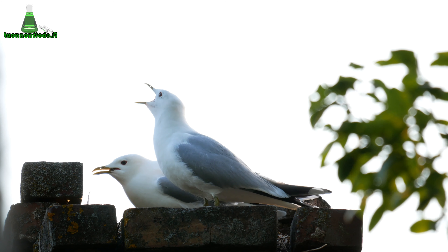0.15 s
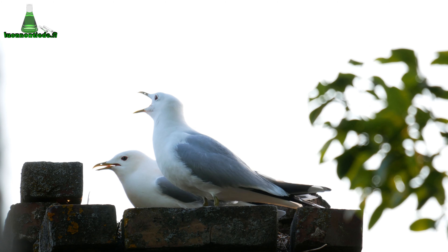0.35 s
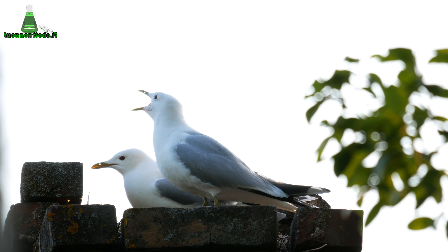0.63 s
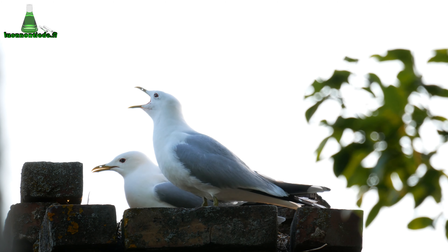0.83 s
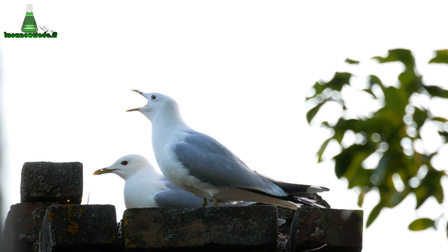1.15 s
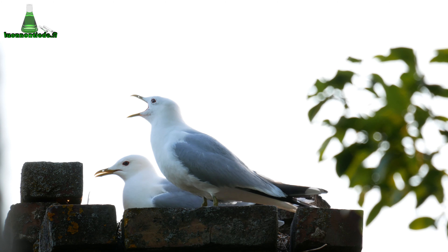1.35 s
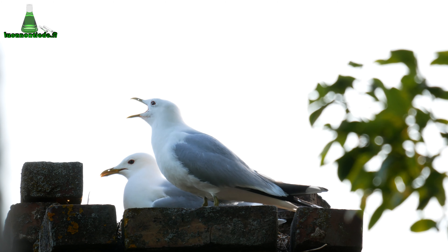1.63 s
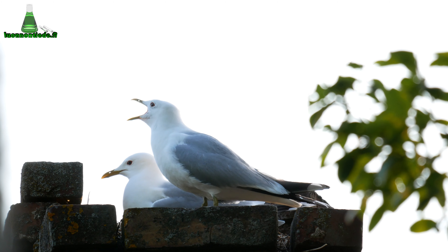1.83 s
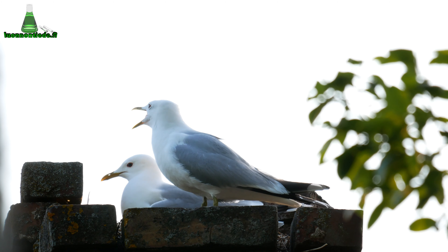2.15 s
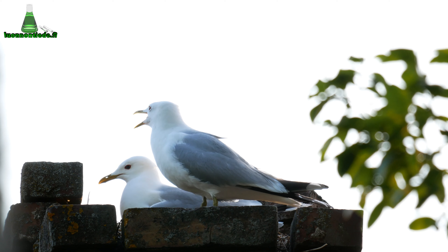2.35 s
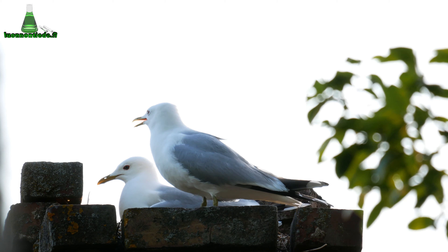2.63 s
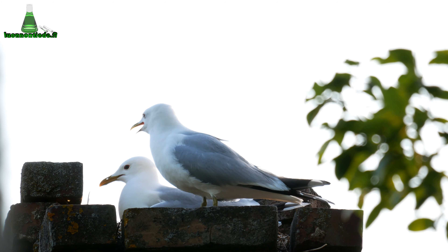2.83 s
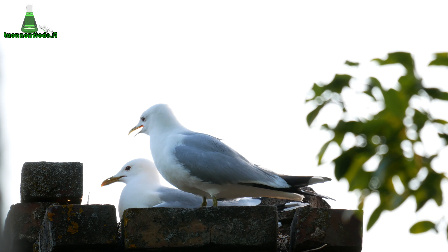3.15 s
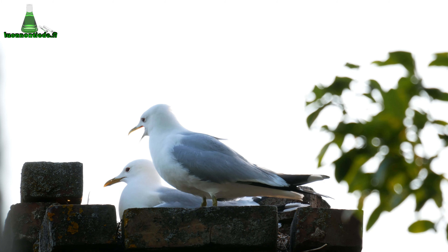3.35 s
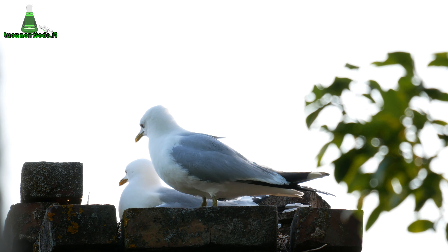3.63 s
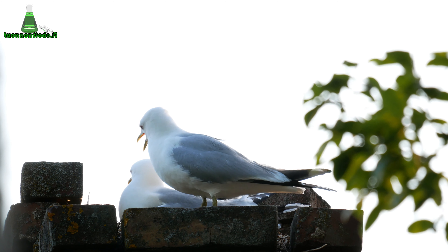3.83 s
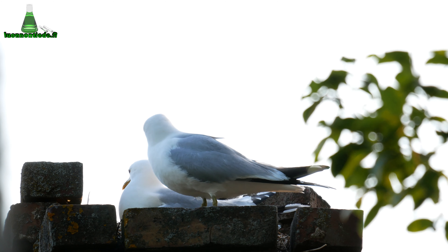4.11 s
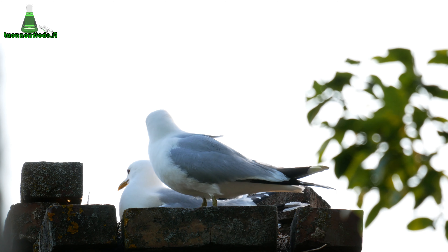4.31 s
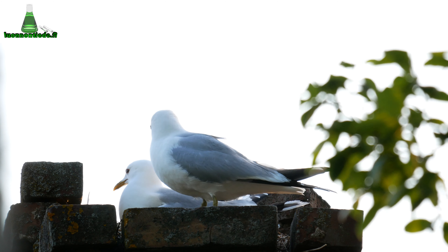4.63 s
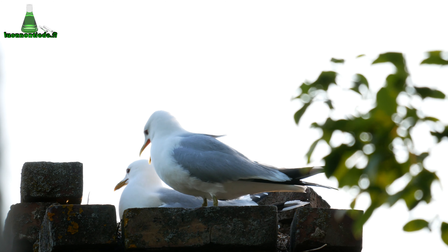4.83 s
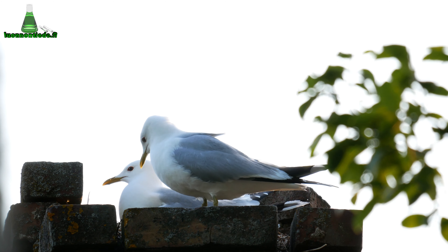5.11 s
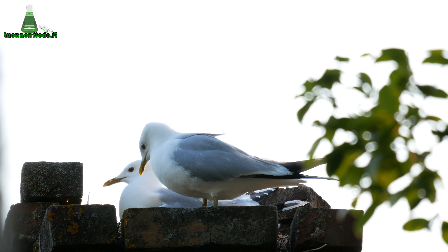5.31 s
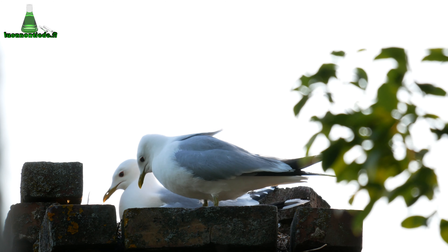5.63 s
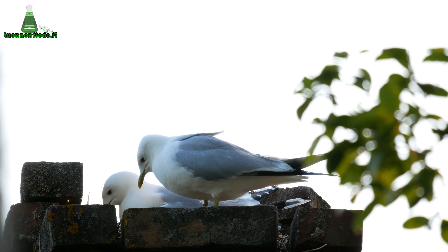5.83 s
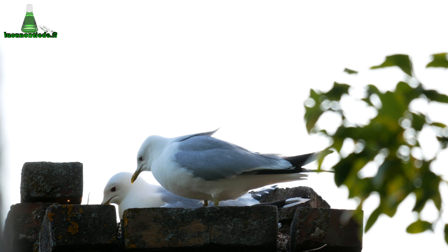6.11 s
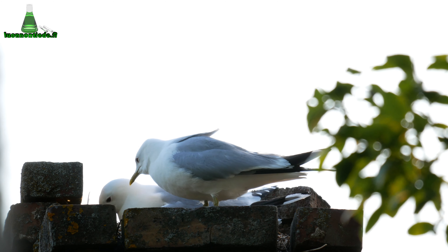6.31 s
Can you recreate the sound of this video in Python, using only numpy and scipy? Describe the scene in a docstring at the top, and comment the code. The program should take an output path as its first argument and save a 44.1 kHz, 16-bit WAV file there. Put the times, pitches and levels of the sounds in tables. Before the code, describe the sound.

A gull calls loudly in the open, already mid-cry at the start. Piercing cries follow about three a second, each a short rasp breaking into a squeal; the early ones flip through a thin whistle, later ones are shorter single yelps. After a small gap comes one last cry, then only faint distant traffic. The bird is clear and almost central, with slapping echoes from walls and gardens spread around it.

```python
"""Gull's long call from a chimney

A gull gives fifteen cries, the first already under way and the last one alone; its bill sinks midway.
Each cry starts as a low rasp and breaks up into a squeal; the early ones flip into a thin whistle on the way.
The voice is summed harmonics and pulsed hiss, shaped by throat and bill.
Walls and gardens answer as echoes and scattered noise, over distant traffic made of coloured noise."""
import sys
import numpy as np
from scipy import signal
from scipy.fft import rfft, irfft, next_fast_len
from scipy.io import wavfile
from scipy.ndimage import uniform_filter1d, map_coordinates

SR = 44100
rng = np.random.default_rng(int(sys.argv[2]) if len(sys.argv) > 2 else 0)


def wrap_up_sound(samples):
    """Save the sound to the file named by the first command line argument, as 16-bit audio."""
    columns = np.atleast_2d(samples).T
    # keep every value between -1 and 1, then stretch to whole-number steps
    tamed = np.clip(columns, -1, 1)
    steps = np.round(tamed * 32767).astype(np.int16)
    wavfile.write(sys.argv[1], SR, steps)


N = 285327
LEAD = SR // 4  # samples of calling before time zero
TIME = np.arange(-LEAD, N) / SR  # the gull is already calling at time zero
TOP_HZ = 15150  # band limit

# All dB columns are relative: mix trims are added where the layers are built.

# Early cries: rasp, squeal, whistle, squeal. Each row: voice break in seconds, then lengths in seconds
# of rasp, first squeal, whistle, hold before the slip and slide after it, then top pitch, scoop and slip
# in Hz, then level, second harmonic and upper harmonics in dB.
EARLY_CRIES = [ (-0.16, 0.049, 0.048, 0.097, 0.074, 0.013, 1240, 122, 172, -0.5, -0.5, -0.5),
               (0.214, 0.027, 0.05, 0.082, 0.051, 0.021, 1302, 164, 122, 0, -1.5, 0),
               (0.577, 0.042, 0.054, 0.061, 0.055, 0.025, 1342, 127, 147.3, -1.5, -1, 0.5),
               (0.927, 0.037, 0.049, 0.062, 0.054, 0.022, 1341, 124.6, 147.4, -0.5, -0.5, 1.5),
               (1.272, 0.044, 0.046, 0.065, 0.047, 0.021, 1365, 128.5, 155.6, 0, 0, 1.5),
               (1.614, 0.047, 0.047, 0.048, 0.038, 0.031, 1376, 113.7, 98.3, 0.5, 0, 0.5),
               (1.947, 0.045, 0.056, 0.031, 0.025, 0.039, 1365, 106, 34, -1, 1, 0)]
# Late cries: rasp, one arched squeal. Each row: voice break in seconds, lengths in seconds of rasp, rise
# and fall, top pitch in Hz, scoop in Hz, slide in Hz per second, slip in Hz, collapse in Hz,
# then level, second harmonic and upper harmonics in dB.
LATE_CRIES = [ (2.272, 0.045, 0.045, 0.096, 1346, 106, 1110, 61.5, 90, 0.5, 1, 2),
              (2.593, 0.048, 0.041, 0.088, 1314, 97, 2525, 33.5, 120, 1.5, 1, -2.5),
              (2.924, 0.041, 0.05, 0.095, 1336, 70.5, 2026, 31.5, 71, 1, 4, 1),
              (3.263, 0.028, 0.048, 0.091, 1307, 95, 1674, -3.5, 236, 0.5, 1.5, 0),
              (3.609, 0.043, 0.042, 0.092, 1349, 55.8, 2390, 2, 217, 0.5, 1, 1),
              (3.988, 0.039, 0.039, 0.095, 1373, 48.7, 2777, 0.5, 190, 0, 0.5, 0.5),
              (4.379, 0.034, 0.04, 0.11, 1419, 63.6, 2726, 1.5, 234, -1, 1, -1),
              (5.035, 0.025, 0.04, 0.087, 1466, 134.4, 4540, -0.5, 130, -1.5, -3.5, 1.5)]

# How far the bill has sunk. Each row: time in seconds, drop (0 raised, 1 lowered).
BILL_DROP = [(2.45, 0.26), (3.1, 0.95)]
# Colour of the upper harmonics, bill raised and lowered. Each row: frequency in Hz, gain in dB.
BILL_RAISED = [(3000, -27.5), (3600, -9.5), (4000, -5.5), (4600, -15), (5300, -0.5), (6000, -10),
               (6800, -15.5), (7500, -16), (7950, -17), (8600, -36), (9600, -42), (10800, -36),
               (12200, -72.5)]
BILL_LOWERED = [(3000, -10.5), (3450, -11), (3850, 5), (4150, 1), (4400, 4), (4800, -12.5), (5600, -10.5),
                (6400, 0.5), (6900, -3.5), (7300, -3), (7800, -14.5), (8500, -17.5), (9600, -25.5),
                (10800, -47), (12500, -61.5)]
# Throat gain on the two lowest harmonics, bill raised and lowered. Each row: frequency in Hz, gain in dB.
THROAT_RAISED = [(900, -64.5), (1020, -66), (1120, -47.5), (1210, -45.5), (1350, -45.5), (1850, -34),
                 (2050, -29), (2220, -29), (2350, -24.5), (2460, -31), (2560, -33.5), (2760, -41)]
THROAT_LOWERED = [(900, -70), (1170, -52.5), (1340, -47.5), (1470, -49.5), (1760, -45.5), (2050, -42.5),
                  (2330, -44.5), (2450, -38), (2700, -36.5), (2930, -35)]
# Colour of the throat turbulence. Each row: frequency in Hz, density in dB per Hz.
HISS_COLOUR = [(1000, -27), (1500, -18), (2000, -6.5), (2800, -6), (3400, -13), (4300, -6.5), (5300, -6.5),
               (7200, -23.5), (8200, -31.5), (10800, -39.5), (12000, -67.5)]
# How hard the membrane rattles, most in the opening cry. Each row: time in seconds,
# level in dB against the tone's harmonics.
HARSHNESS = [(0, 6.5), (.04, -7), (.07, -8), (1, -11), (1.8, -7), (2.4, -11), (3.3, -23), (5.1, -15)]

# Swell of an early cry's first squeal. Each row: share of its length,
# then fundamental, second harmonic and upper harmonics in dB.
OPENING_SWELL = [(0, -2, 4, -51), (.2, 0.5, 3.5, -47), (.45, 1.5, -3, -41), (1, -8.5, -4.5, -51)]
# Swell of an early cry's last squeal. Each row: stage (0 start, 1 slip, 2 end),
# then fundamental, second harmonic and upper harmonics in dB.
CLOSING_SWELL = [(0, 3.5, -4, -39.5), (.45, 3, 4.5, -38), (.88, 0.5, 1, -38.5), (1.2, -1, 3.5, -50),
                 (2, -6, 0.5, -40)]
# Swell of a late cry's squeal. Each row: share of its length,
# then fundamental, second harmonic and upper harmonics in dB.
ARCH_SWELL = [(0, -4, -3.1, -48.5), (.15, -1, 0.54, -40.5), (.33, 1.5, 0.87, -44), (.55, -1, 0.58, -45),
              (.82, -1.5, 1, -48), (1, -4, -1.5, -53)]
# An early cry's first squeal scoops up to a plateau just under the top pitch.
PLATEAU_SHARE, SCOOP_S, SCOOP_WIDTH_S, PLATEAU_SAG_HZ_PER_S = 0.97, 0.0142, 0.0027, 784
# Its last squeal droops, slips down abruptly and slides away.
DROOP_HZ, SLIP_WIDTH_S, SLIDE_HZ_PER_S = 44, 0.0013, 5000
# A late cry rounds over its crest, may slip soon after, and collapses as the air runs out.
CREST_ROUND_S, SLIP_AFTER_S, COLLAPSE_S = .01, 0.0336, 0.00834
# Before a late cry's slip the voice chokes, the more the deeper the slip; the second harmonic sinks most.
CHOKE_DB_PER_HZ, CHOKE_LEAD_S, CHOKE_OTHERS_SHARE = .12, .018, 0.47
# The second harmonic's level flutters at random throughout each squeal.
FLUTTER_DB, FLUTTER_PER_S = 1.5, 109.2

# Wall echoes. Each row: delay in seconds, level in dB.
WALLS = [(.0096, -12), (0.0185, -13.5), (0.035, -35), (0.0809, -8), (0.131, -22.5)]
# Colour of the wall echoes. Each row: frequency in Hz, gain in dB.
WALL_COLOUR = [(700, -0.5), (1300, 0), (1750, -4), (2400, -7.5), (3100, 5.5), (4200, -4.5), (6200, 2),
               (7200, -16), (9000, -19.5)]
# Die-away of the outdoor tail. Each row: frequency in Hz, time to fall 60 dB in seconds.
YARD_DECAY = [(600, 2.5), (1400, 1.54), (2800, 1.007), (4000, 0.91), (6000, 0.65), (11000, 0.3)]
# Colour of the outdoor tail. Each row: frequency in Hz, gain in dB.
YARD_COLOUR = [(600, 0), (1350, 3), (2200, 0), (2500, 0.5), (2800, 6.5), (3200, 6), (4300, 5), (5500, 5.5),
               (7200, 4), (9000, 15)]
# Sideways share of the answer. Each row: frequency in Hz, side gain in dB.
YARD_SIDE = [(600, -4), (1400, -3.5), (2600, -5.5), (4200, -8.5), (8000, -15.5)]

# Distant traffic and air, mid and side. Each row: frequency in Hz, density in dB per Hz.
AIR_MID = [(25, -15), (50, -14), (110, -7), (180, 0), (300, 0.5), (450, -2), (620, 2.5), (800, -3),
           (1000, -6), (1800, -11), (4200, -16), (7000, -26), (10000, -32), (12500, -40), (15000, -42)]
AIR_SIDE = [(25, -21), (50, -19), (110, -6), (175, -.5), (280, .5), (450, -3), (650, -3), (1100, -9),
            (2500, -20), (4500, -32), (7500, -42), (15000, -49)]
# The traffic's slow swell. Each row: time in seconds, level in dB.
TRAFFIC_SWELL = [(0, -64.3), (1.3, -63.5), (3.4, -64.6), (4.3, -63.8), (5.6, -64.4), (6.47, -66)]

# The rasp's shape. Each row: share of its length, pitch in Hz, swell in dB.
RASP_SHAPE = [(0, 560, -23), (.35, 730, -9), (.65, 820, -1), (.92, 870, 0), (1, 1050, -1)]
# Throat resonances in the rasp. Each row: frequency in Hz, gain in dB.
RASP_THROAT = [(550, 4), (850, -17), (1300, -3), (1700, -0.5), (2400, 2.5), (3100, -9.5), (4000, -9),
               (5000, -19.5), (6500, -16), (8000, -30.5), (11000, -52), (13000, -88)]
# The rasp's level, and its change once the bill is fully lowered.
RASP_DB, RASP_LOWERED_DB = -34.5, -6.5

# A longer whistle bends further. Each row: share of its length, share of pitch lost per second of length.
WHISTLE_BEND = [(0, 0.367), (.35, 0.013), (0.681, 0.11), (1.001, 1.337)]
# The whistle thins as it climbs away from the throat resonance. Each row: frequency in Hz, gain in dB.
WHISTLE_THROAT = [(2750, -33.5), (2880, -33.5), (3060, -36), (3140, -40.5), (3240, -45)]
# Unbent whistle pitch over the cry's top pitch, and level of its overtones.
WHISTLE_RATIO, WHISTLE_OCTAVE_DB = 2.35, -44.5


def amp(db):
    """Decibels to gain."""
    return 10 ** (np.asarray(db) / 20)


def unit(x):
    """x at rms 1."""
    return x / np.sqrt(np.mean(x ** 2) + 1e-20)


def along(points, hz):
    """Read (Hz, value) points on a log frequency axis."""
    f, v = np.transpose(points)
    return np.interp(np.log(hz + 1), np.log(f + 1), v)


def wobble(rate, size):
    """A smooth random curve, rate knots a second."""
    knots = rng.standard_normal(int(size * rate / SR) + 4)
    return map_coordinates(knots, [np.arange(size) * rate / SR])


def step(t, width):
    """A smooth rise from 0 to 1 around t = 0."""
    return .5 + .5 * np.tanh(t / (2 * width))


def filtered(x, response):
    """x times a response of frequency."""
    size = x.shape[-1]
    m = next_fast_len(size + SR // 4)
    return irfft(rfft(x, m) * response(np.fft.rfftfreq(m, 1 / SR)), m)[..., :size]


def note(rows, fade):
    """The samples a note covers, its soft-edged gate, and its columns as curves."""
    s, *cols = np.transpose(rows)
    span = np.flatnonzero((TIME > s[0] - fade) & (TIME < s[-1] + fade))
    t = TIME[span]
    edge = np.clip(np.minimum(t - s[0], s[-1] - t) / (2 * fade) + .5, 0, 1)
    gate = np.sin(edge * np.pi / 2) ** 2
    return span, gate, [np.interp(t, s, c) for c in cols]


def syrinx(pitch, jitter, waver, shimmer_db, count):
    """Harmonics of about rms 1 from a membrane whose cycles vary a little in length and strength."""
    size = len(pitch)
    hz = pitch * (1 + jitter * wobble(900, size) + waver * wobble(123.7, size))
    phase = 2 * np.pi * np.cumsum(hz) / SR + rng.uniform(0, 2 * np.pi)
    orders = np.arange(1, count + 1)[:, None]
    shimmer = amp(shimmer_db * wobble(500, size))
    return np.sqrt(2) * np.sin(orders * phase) * shimmer, orders * pitch


def blend(partials, db):
    """Partials summed at relative levels, to about rms 1."""
    gain = amp(db)
    return (partials * gain).sum(0) / np.linalg.norm(gain, axis=0)


def hiss(pitch):
    """Throat turbulence of rms 1, let through once a cycle."""
    pulses = 1 + np.cos(2 * np.pi * np.cumsum(pitch) / SR)
    breath = pulses * rng.standard_normal(len(pitch))
    return unit(filtered(breath, lambda hz: amp(along(HISS_COLOUR, hz))))


def bill_drop(t):
    """How far the bill has sunk, 0-1."""
    return np.clip(np.interp(t, *np.transpose(BILL_DROP)), 0, 1)


def posed(raised, lowered, hz, t):
    """A colour in dB between those of the raised and the lowered bill."""
    drop = bill_drop(t)
    return (1 - drop) * along(raised, hz) + drop * along(lowered, hz)


def swelling(shape, stage):
    """The columns of a swell at the given stages."""
    knots, *cols = np.transpose(shape)
    return [np.interp(stage, knots, c) for c in cols]


def squeal_gestures(count=120):
    """Every squeal as (times, pitch, swell, the cry's three levels)."""
    share = np.linspace(0, 1, count)
    for start, _, opening, whistle, hold, slide, top, scoop, slip_hz, *levels in EARLY_CRIES:
        # first squeal: scoop, plateau, sag
        age = share * opening
        pitch = PLATEAU_SHARE * top - scoop * step(SCOOP_S - age, SCOOP_WIDTH_S)
        pitch -= PLATEAU_SAG_HZ_PER_S * age
        yield start + age, pitch, swelling(OPENING_SWELL, share), levels
        # last squeal: droop, slip, slide
        age = share * (hold + slide)
        stage = np.interp(age, [0, hold, hold + slide], [0, 1, 2])
        pitch = top - DROOP_HZ * np.minimum(stage, 1) ** 2 - slip_hz * step(age - hold, SLIP_WIDTH_S)
        pitch -= SLIDE_HZ_PER_S * np.maximum(age - hold, 0)
        yield start + opening + whistle + age, pitch, swelling(CLOSING_SWELL, stage), levels
    for start, _, rise, fall, top, scoop, slide, slip_hz, collapse, *levels in LATE_CRIES:
        t = share * (rise + fall) - rise  # time from the crest
        slipped = step(t - SLIP_AFTER_S, SLIP_WIDTH_S)
        pitch = top - scoop * (np.minimum(t, 0) / rise) ** 2 - slip_hz * slipped
        pitch -= slide * (np.hypot(np.maximum(t, 0), CREST_ROUND_S) - CREST_ROUND_S)
        pitch -= collapse * np.exp((t - fall) / COLLAPSE_S)
        first, second, upper = swelling(ARCH_SWELL, share)
        choke = CHOKE_DB_PER_HZ * slip_hz * (step(t + CHOKE_LEAD_S, SLIP_WIDTH_S) - slipped)
        others = CHOKE_OTHERS_SHARE * choke
        yield start + rise + t, pitch, (first - others, second - choke, upper - others), levels


def squeals(second_db=0, first_db=0, upper_db=-4, hiss_db=-3, halves_db=-3):
    """The main register: the throat lifts the second harmonic, the bill colours the upper ones."""
    out = np.zeros(len(TIME))
    for times, contour, swell, (db, lift_db, bright_db) in squeal_gestures():
        rows = np.column_stack([times, contour, *swell])
        span, gate, (pitch, first, second, upper) = note(rows, fade=.003)
        # a series on half the pitch: odd rows are the true harmonics, even rows lie halfway between
        series, hz = syrinx(pitch / 2, jitter=.004, waver=.002, shimmer_db=.5, count=18)
        partials, upper_hz = series[1::2], hz[5::2]
        bill = posed(BILL_RAISED, BILL_LOWERED, upper_hz, TIME[span])
        throat = posed(THROAT_RAISED, THROAT_LOWERED, np.array([pitch, 2 * pitch]), TIME[span])
        second = second + FLUTTER_DB * wobble(FLUTTER_PER_S, len(span))
        body = amp(throat[0] + first + first_db) * partials[0]
        body += amp(throat[1] + second + lift_db + second_db) * partials[1]
        # alternate cycles differ in fits and starts, which puts lines halfway between the harmonics
        halves = blend(series[2::2], along(HISS_COLOUR, hz[2::2])) * wobble(180, len(span))
        rattle = amp(halves_db) * halves + amp(hiss_db) * hiss(pitch)
        harsh = np.interp(TIME[span], *np.transpose(HARSHNESS))
        edge = amp(upper + bright_db + upper_db) * (blend(partials[2:], bill) + amp(harsh) * rattle)
        out[span] += gate * amp(db) * (body + edge)
    return out


def tail(size, build):
    """Scattered sound that builds up over build seconds, then dies faster in the treble."""
    hz, t, z = signal.stft(rng.standard_normal(size), SR, nperseg=256)
    decay = amp(-60 * t / along(YARD_DECAY, hz)[:, None]) * (1 - np.exp(-t / build))
    return signal.istft(z * decay, SR, nperseg=256)[1][:size] / np.sqrt(SR * .07)


def yard(voice, tail_db=-9, near_db=-13, near_t60=0.073, wall_db=0, lowered_db=1.5):
    """Mid and side of the voice with wall echoes, scatter from near roofs and a long outdoor tail."""
    size = int(SR * 1.2)
    t = np.arange(size) / SR
    near = rng.standard_normal((2, size)) * amp(-60 * t / near_t60) * (t > .004)
    far = np.array([tail(size, build=0.0022) for _ in range(2)])
    answer = amp(near_db) * near / np.linalg.norm(near[0])
    answer += amp(tail_db) * filtered(far, lambda hz: amp(along(YARD_COLOUR, hz)))
    echoes = np.zeros(size)
    for delay, db in WALLS:
        echoes[round(delay * SR)] = amp(db + wall_db)
    answer[0] += filtered(echoes, lambda hz: amp(along(WALL_COLOUR, hz)))
    # a lowered, turned head sends more sound round about
    spread = voice * amp(lowered_db * bill_drop(TIME))
    mid, side = signal.fftconvolve(spread[None], answer, axes=1)[:, :len(voice)]
    side = filtered(side, lambda hz: amp(along(YARD_SIDE, hz)))
    return np.array([voice + mid, side])[:, LEAD:]


def rush(spectrum, patchy_db, patchy_hz):
    """Coloured noise of rms 1 whose low bands swell and sink on their own."""
    hz, _, z = signal.stft(rng.standard_normal(N), SR, nperseg=2048)
    patches = uniform_filter1d(rng.standard_normal(z.shape), 3, 0)  # smooth over frequency
    field = unit(uniform_filter1d(patches, 9, 1))  # then over time
    depth = patchy_db / (1 + (hz[:, None] / patchy_hz) ** 2)
    noise = signal.istft(z * amp(depth * field), SR, nperseg=2048)[1][:N]
    return unit(filtered(noise, lambda hz: amp(along(spectrum, hz))))


def air(mid_db=3.0, side_db=7.0):
    """Mid and side of distant traffic as separate noises, very wide in the bass."""
    level = np.interp(TIME[LEAD:], *np.transpose(TRAFFIC_SWELL))
    mid = rush(AIR_MID, patchy_db=1.5, patchy_hz=1500)
    side = rush(AIR_SIDE, patchy_db=1.5, patchy_hz=1500)
    return amp(level) * np.array([amp(mid_db) * mid, amp(side_db) * side])


def rasps(level_db=-1, hiss_db=-4):
    """The low register: a rough upward slide, rich in harmonics, until the voice breaks."""
    out = np.zeros(len(TIME))
    for end, length, *_, db, _, _ in EARLY_CRIES + LATE_CRIES:
        rows = [(end - (1 - share) * length, hz, swell) for share, hz, swell in RASP_SHAPE]
        span, gate, (pitch, swell) = note(rows, fade=.003)
        partials, hz = syrinx(pitch, jitter=.011, waver=.006, shimmer_db=1.5, count=15)
        harsh = np.interp(end - length, *np.transpose(HARSHNESS))
        tone = blend(partials, along(RASP_THROAT, hz)) + amp(harsh + hiss_db) * hiss(pitch)
        rasp_db = RASP_DB + RASP_LOWERED_DB * bill_drop(end) + db + swell + level_db
        out[span] += gate * amp(rasp_db) * tone
    return out


def whistles(level_db=0, third_db=-26, hiss_db=-22):
    """The top register: an almost pure tone with its octave and a trace of third harmonic and hiss."""
    out = np.zeros(len(TIME))
    for start, _, opening, length, _, _, top, _, _, db, _, _ in EARLY_CRIES:
        on = start + opening
        rows = [(on + share * length, WHISTLE_RATIO * top * (1 - bend * length))
                for share, bend in WHISTLE_BEND]
        span, gate, (pitch,) = note(rows, fade=0.0018)
        partials, _ = syrinx(pitch, jitter=.004, waver=.002, shimmer_db=.6, count=3)
        overtones = partials[1] + amp(third_db) * partials[2]
        tone = partials[0] + amp(hiss_db) * hiss(pitch)
        whistle = amp(along(WHISTLE_THROAT, pitch)) * tone + amp(WHISTLE_OCTAVE_DB) * overtones
        out[span] += gate * amp(db + level_db) * whistle
    return out


def scene(gull_db=-1):
    """The gull almost straight ahead, in its surroundings, as left and right."""
    gull = squeals() + rasps() + whistles()
    mid, side = amp(gull_db) * yard(gull) + air()
    balance = amp([[.25], [-.25]])  # a touch to the left
    return np.array([mid + side, mid - side]) * balance


def record(dry, notch_hz=7900, notch_width_hz=150, notch_db=-12):
    """A narrow notch in the treble; nothing is kept above the band limit."""
    notch = lambda hz: amp(notch_db * np.exp(-((hz - notch_hz) / notch_width_hz) ** 2))
    soft_start = np.minimum(TIME[LEAD:] / .002, 1)
    return filtered(dry * soft_start, lambda hz: notch(hz) * (hz < TOP_HZ))


dry = scene()
out = record(dry)
wrap_up_sound(out)
```